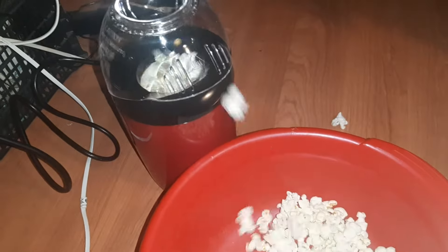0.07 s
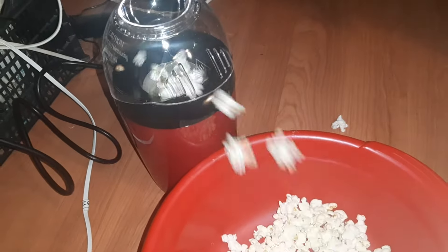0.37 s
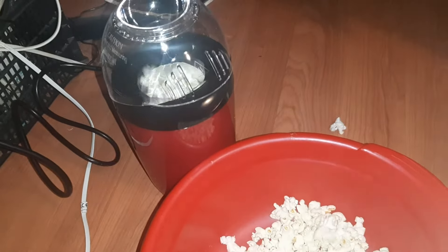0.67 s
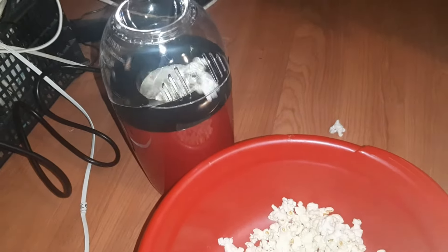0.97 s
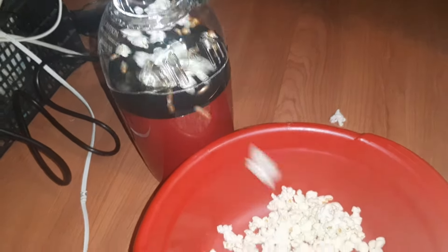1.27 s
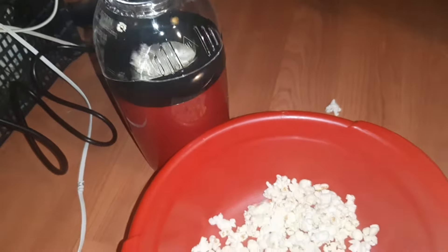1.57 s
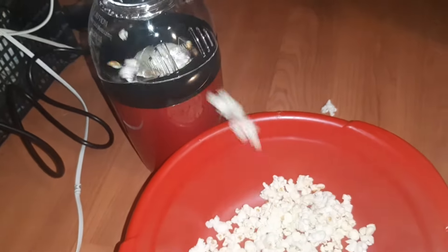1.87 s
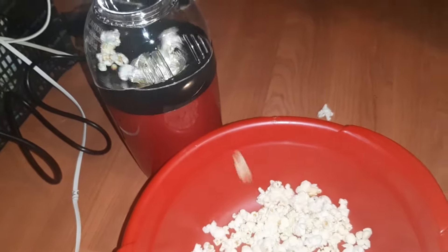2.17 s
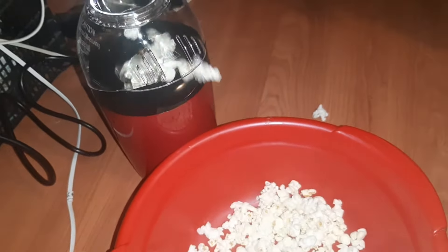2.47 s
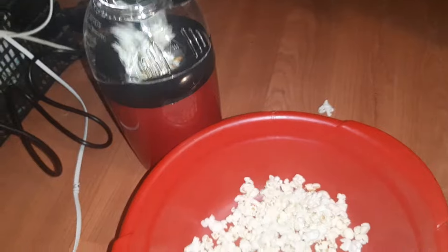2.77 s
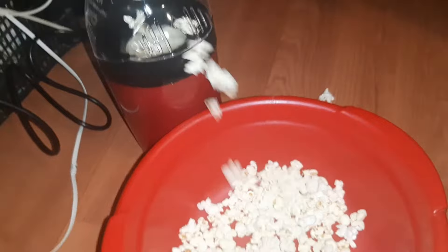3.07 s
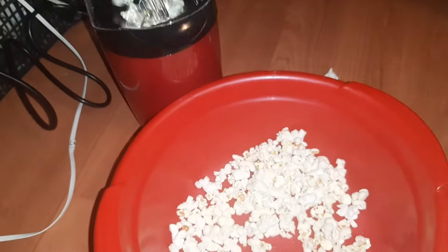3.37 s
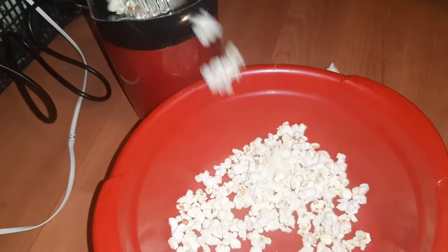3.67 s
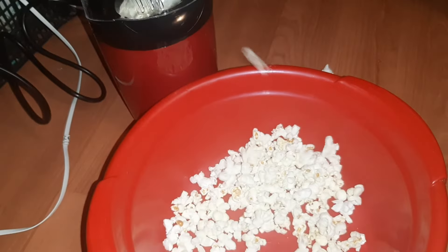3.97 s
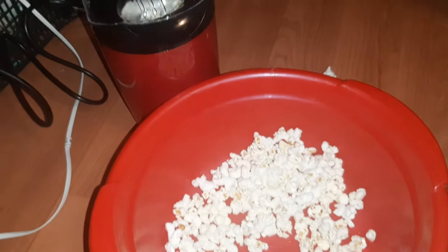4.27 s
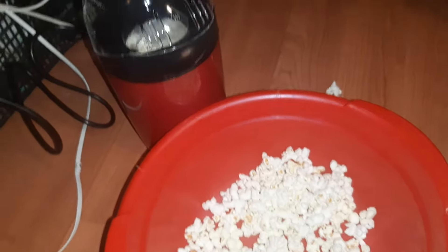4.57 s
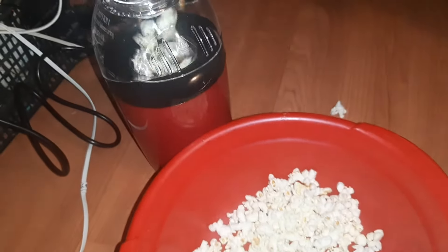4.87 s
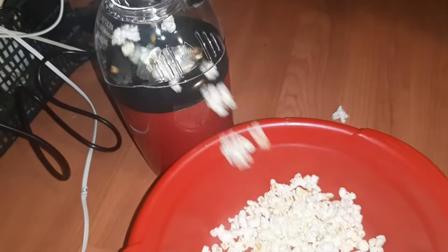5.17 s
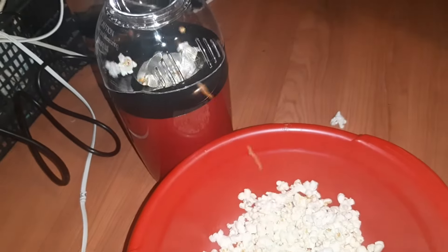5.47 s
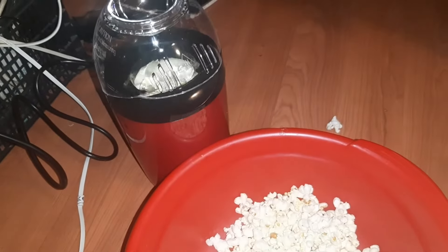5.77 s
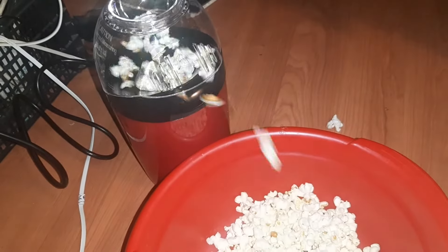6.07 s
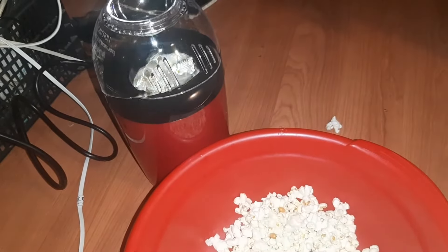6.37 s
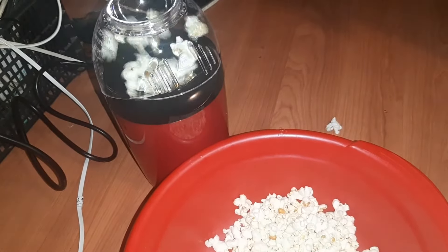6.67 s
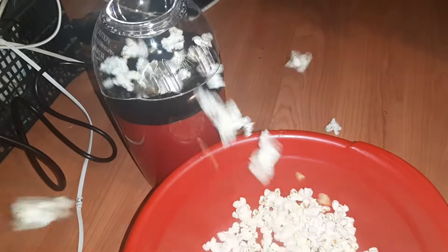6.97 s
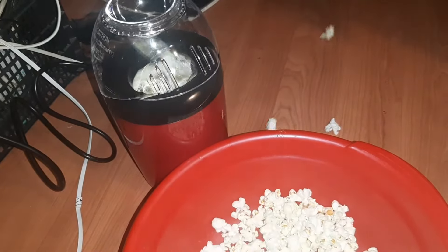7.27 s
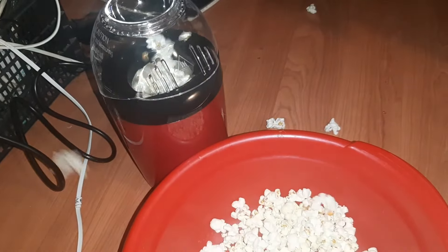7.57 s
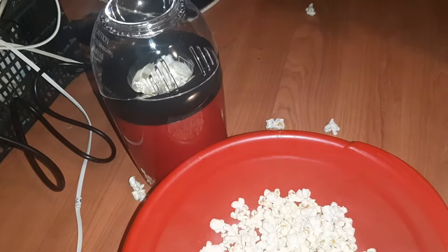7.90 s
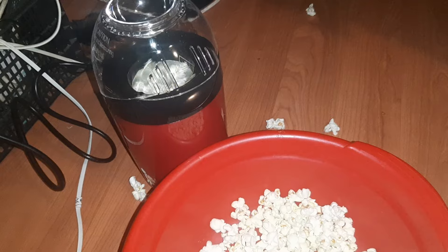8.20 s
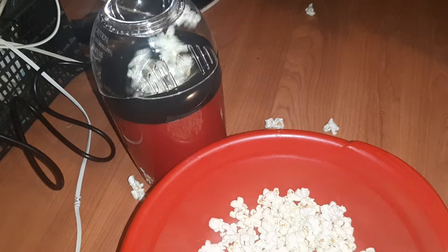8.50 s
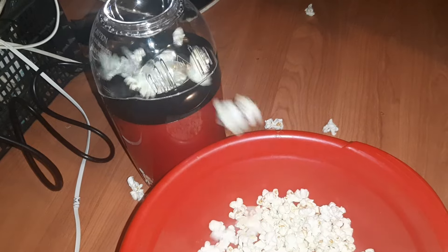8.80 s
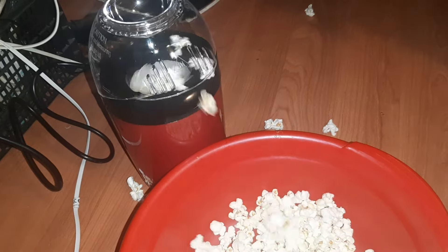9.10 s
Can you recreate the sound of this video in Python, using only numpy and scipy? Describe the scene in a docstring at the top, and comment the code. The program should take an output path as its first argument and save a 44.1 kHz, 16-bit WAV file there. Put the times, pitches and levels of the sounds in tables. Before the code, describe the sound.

A hot air popcorn maker hums and blows close up while kernels crack open and popped pieces rub and tap against plastic.

```python
"""Popcorn kernels burst with a crack and a puff of steam in a hot-air popper, close up in a small room.
The fresh popcorn scrapes and squeaks round the cup and the hood, pieces knock on the plastic,
and two hard pops jolt the housing. Underneath, the fan hums and blows through the popping cup.
A slow gain control sinks the whole sound for about a second after the loudest treble peaks."""
import sys
import numpy as np
from scipy import signal
from scipy.fft import rfft, irfft
from scipy.io import wavfile
from scipy.ndimage import uniform_filter1d, minimum_filter1d

SR = 44100
rng = np.random.default_rng(int(sys.argv[2]) if len(sys.argv) > 2 else 0)


def to_wav(sig):
    """Store sig (one row per channel, or 1-D mono) as 16-bit WAV at the path in sys.argv[1].

    Samples outside -1..1 are clipped; the rate is SR.
    """
    pcm = np.clip(np.atleast_2d(sig), -1, 1) * 32767
    pcm = np.round(pcm).astype(np.int16)
    wavfile.write(sys.argv[1], SR, pcm.T)  # frames by channels


N = 407484
HZ = np.fft.rfftfreq(N, 1 / SR)
FAN_DB = -21.5  # base level of the air, hum and swirl


def gain_of(db):
    """Decibels to gain."""
    return 10 ** (np.asarray(db) / 20)


def unit_rms(x):
    """Scales to rms 1."""
    return x / np.sqrt(np.mean(x ** 2) + 1e-20)


def at_hz(points, hz):
    """Reads a curve on a log-frequency axis."""
    freqs, values = np.transpose(points)
    return np.interp(np.log(hz + 1), np.log(freqs + 1), values)


def automation(points):
    """Reads a curve over time at every sample."""
    times, values = np.transpose(points)
    return np.interp(np.arange(N) / SR, times, values)


def add(mix, s, sound):
    """Mixes a sound in at s seconds."""
    part = mix[..., round(s * SR):][..., :sound.shape[-1]]
    part += sound[..., :part.shape[-1]]


def wander(rate_hz):
    """Smooth random modulation of rms 1."""
    return unit_rms(irfft(rfft(rng.standard_normal(N)) / (1 + (HZ / rate_hz) ** 4), N))


def grit(depth_db, size, hold):
    """A gain that jumps about within +/- depth_db, roughly every hold samples."""
    jumps = unit_rms(uniform_filter1d(rng.standard_normal(size), hold))
    return gain_of(depth_db * np.tanh(jumps))


def stroke(t, length_s, rise_s, ring_s):
    """An envelope that builds up, holds, then rings out."""
    return (1 - np.exp(-t / rise_s)) * np.exp(-np.maximum(t - length_s, 0) / ring_s)


def colour(x, gain):
    """Minimum-phase EQ with the given gain at each bin of x."""
    log_gain = np.log(np.maximum(np.r_[gain, gain[-2:0:-1]], 1e-5))
    phase = -signal.hilbert(log_gain).imag[:len(gain)]
    return irfft(rfft(x) * gain * np.exp(1j * phase))


def resonance(hz, centre_hz, width_hz):
    """Gain of a resonant band, 1 at its centre."""
    return 1 / np.sqrt(1 + ((hz ** 2 - centre_hz ** 2) / (width_hz * (hz + 1))) ** 2)


def from_left(x, lag_s):
    """The sound reaches the right microphone a little later."""
    return irfft(rfft(x) * np.exp(-2j * np.pi * HZ * lag_s * np.arange(2)[:, None]), N)


# Stereo image, tight in the bass and wide on top: (frequency [Hz], coherence [0-1])
COHERENCE = [(100, 0.99), (500, 0.9), (1000, 0.34), (2000, 0.59), (5000, 0.09), (15000, 0)]
def paired(x):
    """Makes two unrelated noises as alike as the two microphones hear them."""
    left, other = rfft(x)
    same = np.clip(at_hz(COHERENCE, HZ), 0, 1)
    return irfft(np.array([left, same * left + np.sqrt(1 - same ** 2) * other]), N)


# The small room's tail: (frequency [Hz], time to fall 60 dB [s])
ROOM_DECAY = [(150, 0.24), (1000, 0.91), (4000, 0.61), (8000, 0.028), (15000, 0.038)]
def room(x, gap_s=.005, size=22050):
    """Sparse reflections, each band dying at its own speed."""
    taps = rng.choice([-1., 1.], (2, size)) * (rng.random((2, size)) < .1)
    taps *= np.arange(size) > gap_s * SR
    hz, t, bands = signal.stft(taps, SR, nperseg=256)
    decay = gain_of(-60 * t / at_hz(ROOM_DECAY, hz)[:, None])
    tail = signal.istft(bands * decay, SR, nperseg=256)[1]
    return signal.fftconvolve(x, tail / np.linalg.norm(tail[0]), axes=1)[:, :N]


# Peaks and notches of the hood: (centre [Hz], width [Hz], gain before depth scaling [dB])
HOOD_EQ = [(1527, 110, -9), (1596, 157, 6), (2200, 46, -16), (2445, 89, 6), (3100, 890, -2.5),
           (3890, 230, 1.5), (4540, 43, 6.5), (5430, 2300, -4), (5770, 67, 6.5), (7340, 83, 1),
           (7740, 1070, -7), (8040, 140, 8.5), (11300, 240, 1.5)]
def hooded(x, depth=1.177):
    """The space under the hood colours what sounds inside it."""
    eq_db = sum(db * resonance(HZ, centre, width) ** 2 for centre, width, db in HOOD_EQ)
    return irfft(rfft(x) * gain_of(depth * eq_db), N)


# The bed of rushing air: (frequency [Hz], relative level [dB])
AIR_SPECTRUM = [(30, -42.5), (90, -23.5), (170, -14), (280, -7.5), (390, -12), (560, -4.5), (1200, -5.5),
                (1900, -11.5), (3300, -11), (4500, -7.5), (7000, -17.5), (9300, -31), (12000, -29),
                (15700, -38.5), (17000, -68)]
# Resonances of the air duct: (centre [Hz], width [Hz], lift above the rush [dB])
DUCT_MODES = [(525.7, 41, 12.5), (649.4, 42, 11), (751, 38, 10.5), (795, 5.9, 16.5), (866.6, 14, 13),
              (925, 66, 4), (1071, 28, 4.5), (1145, 44, 4.5), (1239, 32, 8)]
def air(level_db=-5.0, flicker_db=1.23):
    """Turbulence coloured by the duct, its level flickering slightly."""
    peaks = sum((gain_of(db) * resonance(HZ, hz, width) ** 2) ** 2 for hz, width, db in DUCT_MODES)
    spectrum = gain_of(at_hz(AIR_SPECTRUM, HZ)) * np.sqrt(1 + peaks)
    rush = irfft(rfft(rng.standard_normal((2, N))) * spectrum, N)
    return gain_of(FAN_DB + level_db + flicker_db * wander(23.0)) * unit_rms(rush)


# The fan's pitch, sagging a little: (time [s], pitch [Hz])
FAN_PITCH = [(0, 226.7), (1.1, 226.3), (1.9, 224.2), (7.9, 224.0), (9.24, 223.3)]
# Timbre of the hum: (harmonic [number], relative level [dB])
HUM_HARMONICS = [(1, 4.5), (2, -24), (3, -11), (5, -21.5), (6, -22), (7, -22), (10, -23)]
def hum(flutter=0.063, jitter_hz=0.548):
    """The fan's nearly pure tone with weak overtones."""
    cycles = np.cumsum(automation(FAN_PITCH) + jitter_hz * wander(26.2)) / SR
    tone = sum(gain_of(db) * np.cos(2 * np.pi * (k * cycles + rng.random())) for k, db in HUM_HARMONICS)
    return gain_of(FAN_DB) * unit_rms(tone) * (1 + flutter * wander(21))


# The whistle fades out as the fan slows: (time [s], level [dB])
WHISTLE_FADE = [(0, -57), (1.05, -55), (1.2, -86)]
def whistle(harmonic=50, waver_hz=9):
    """A faint, thin tone locked to the motor's speed."""
    hz = harmonic * automation(FAN_PITCH) + waver_hz * wander(15)
    return gain_of(automation(WHISTLE_FADE)) * np.sqrt(2) * np.sin(2 * np.pi * np.cumsum(hz) / SR)


def swirl(per_s=70, level_db=-15, fade_db_per_s=1.1, spread_db=4, ring_s=0.009):
    """Unpopped kernels tick as the air drives them round the cup, fading as they are used up."""
    hits = (rng.random(N) < per_s / SR) * gain_of(spread_db * np.minimum(rng.exponential(1, N), 3))
    ticks = signal.lfilter([1], [1, -np.exp(-1 / (ring_s * SR))], hits) * rng.standard_normal((2, N))
    band = resonance(HZ, centre_hz=2900, width_hz=2800) ** 2
    level = gain_of(FAN_DB + level_db - fade_db_per_s * np.arange(N) / SR)
    return level * unit_rms(irfft(rfft(ticks) * band, N))


# Low-end weight under two hard pops: (time [s], level [dB])
JOLTS = [(4.858, -18.5), (6.892, -8.5)]
def bumps(thud_hz=85, fall_s=0.0028, rebound_s=.01, rebound_db=-10, left_db=3, size=4096):
    """The light housing gives way with a low, damped thud, and drops back."""
    out, t = np.zeros(N), np.arange(size) / SR
    for s, db in JOLTS:
        thud = gain_of(db) * np.sin(2 * np.pi * thud_hz * t) * np.exp(-t / fall_s)
        add(out, s, thud)
        add(out, s + rebound_s, gain_of(rebound_db) * thud)
    return out * gain_of([[left_db], [-left_db]])


def landings(flight_s=(0.023, .25), softer_db=-20, centre_hz=(1900, 2850)):
    """Each pop flings a piece that lands softly after a random flight; gives cues for knocks()."""
    return [(s + rng.uniform(*flight_s), db + softer_db, rng.uniform(*centre_hz))
            for s, db, _, _ in KERNEL_POPS]


# Hard hits on the plastic: (time [s], relative level [dB], centre [Hz])
HARD_KNOCKS = [(.704, -25, 2280), (1.39, -30.5, 1990), (1.4551, -15.5, 3024), (2.505, -30, 2110),
               (2.5626, -28, 3650), (3.1034, -32.5, 2230), (3.1647, -37, 2900), (3.446, -23.5, 2420),
               (4.864, -29, 1090), (6.0075, -26, 1100), (6.8925, -19, 2700)]
def knocks(level_db=-9, width=0.32, size=4096):
    """Pieces make short contacts, hard and soft, with well-damped plastic."""
    out, t, hz = np.zeros((2, N)), np.arange(size) / SR, np.fft.rfftfreq(size, 1 / SR)
    contact = stroke(t, length_s=.002, rise_s=.0005, ring_s=.0016)
    for s, db, centre_hz in list(HARD_KNOCKS) + landings():
        blow = rng.standard_normal((2, size)) * contact
        band = resonance(hz, centre_hz, width * centre_hz) ** 2
        add(out, s, gain_of(db + level_db) * unit_rms(colour(blow, band)))
    return out


LOW, MIDDLE, HIGH, TOP = 2840, 3222, 4620, 5090  # modes of the cup [Hz]
# Squeak cues: (time [s], length [s], lower mode [Hz], its relative level [dB], upper modes' level [dB])
SQUEAK_CUES = [(.715, .009, MIDDLE, -19, -30), (0.762, .016, LOW, -24, -17.5),
               (1.228, 0.023, LOW, -29, -27.5), (3.482, 0.022, LOW, -17.5, -32),
               (4.888, 0.019, LOW, -19, -12.5), (5.027, 0.011, LOW, -28, -43),
               (6.006, 0.085, LOW, -47.5, -24)]
def squeaks(level_db=1, upper_share=0.34, top_db=-14, waver_hz=35, rough=0.1, fuzz_db=-12, size=8192):
    """Stick and slip locks onto the cup's modes for a moment; a fuzzy ring lingers in the hood."""
    out, t, bins = np.zeros((2, N)), np.arange(size) / SR, np.fft.rfftfreq(size, 1 / SR)
    for s, whole_s, lower_hz, lower_db, upper_db in SQUEAK_CUES:
        upper_s = upper_share * whole_s  # the upper modes slip sooner
        modes = (lower_hz, whole_s, lower_db), (HIGH, upper_s, upper_db), (TOP, upper_s, upper_db + top_db)
        for hz, length_s, db in modes:
            bend, grip = unit_rms(uniform_filter1d(rng.standard_normal((2, size)), size=90))
            tone = unit_rms(np.sin(2 * np.pi * np.cumsum(hz + waver_hz * bend) / SR)) * (1 + rough * grip)
            tone *= stroke(t, length_s, rise_s=0.0013, ring_s=0.013)
            band = resonance(bins, hz, width_hz=260) ** 2
            fuzz = unit_rms(colour(rng.standard_normal((2, size)), band))
            fuzz *= stroke(t, length_s, rise_s=0.0023, ring_s=0.04)
            add(out, s, gain_of(db + level_db) * (tone + gain_of(fuzz_db) * fuzz))
    return out


# Popcorn rubbing along the cup and hood: (time [s], length with echo [s], drag [dB], bite [dB])
SCRAPE_CUES = [(0.291, 0.019, -26, -42), (0.711, 0.039, -12.5, -11), (0.766, .02, -18.5, -13),
               (0.976, 0.012, -29, -33), (1.234, 0.089, -25, -28), (2.556, 0.0094, -15.5, -39),
               (2.804, 0.038, -23.5, -48), (3.477, 0.14, -26.5, -20), (3.78, 0.026, -24.5, -23),
               (4.891, 0.04, -24, -11.5), (5.023, 0.027, -20.5, -31), (5.189, 0.022, -21.5, -31.5),
               (6.009, 0.09, -26.5, -16), (6.688, .02, -30.5, -44), (6.822, 0.033, -15.5, -9.5),
               (6.995, 0.017, -24, -35.5), (7.348, 0.024, -20, -29)]
def scrapes(level_db=-1, bite_hz=5530, drag_hz=3450, bite_share=0.12, drag_wait_s=0.0038,
            width=0.63, echo_db=-14, top_hz=7300, size=8192):
    """Dry popcorn slips unevenly: a bright bite, a lower drag, and a brief echo under the hood."""
    out, t, hz = np.zeros((2, N)), np.arange(size) / SR, np.fft.rfftfreq(size, 1 / SR)
    for s, whole_s, drag_db, bite_db in SCRAPE_CUES:
        bite = (s, bite_share * whole_s, bite_hz, bite_db)
        drag = (s + drag_wait_s, whole_s, drag_hz, drag_db)
        for start, length_s, centre_hz, db in bite, drag:
            slips = grit(depth_db=3.5, size=size, hold=50)
            band = resonance(hz, centre_hz, width * centre_hz) ** 2 / np.sqrt(1 + (hz / top_hz) ** 6)
            rub = unit_rms(colour(slips * rng.standard_normal((2, size)), band))
            contact = stroke(t, length_s / 2, rise_s=.0006, ring_s=0.0082)
            echo = gain_of(echo_db) * stroke(t, length_s, rise_s=0.025, ring_s=.035)
            add(out, start, gain_of(db + level_db) * rub * (contact + echo))
    return out


# The hollow body of escaping steam: (frequency [Hz], relative level [dB])
STEAM_SPECTRUM = [(25, -47), (70, -30), (170, 20.5), (400, -8), (530, -20), (750, -3), (1250, -7),
                  (2200, 0.5), (6000, -64)]
def puffs(steam_db=-17, thump_db=4, thump_hz=125, hollow_db=17, usual_db=-44, follows=0.4, size=4096):
    """Each kernel's steam thumps and sounds the hollow cup; its draught favours the left microphone."""
    thumps, hollow, t = np.zeros(N), np.zeros((2, N)), np.arange(size) / SR
    spectrum = gain_of(at_hz(STEAM_SPECTRUM, np.fft.rfftfreq(size, 1 / SR)))
    thump = stroke(t, length_s=.003, rise_s=.001, ring_s=.005) * np.cos(2 * np.pi * thump_hz * t)
    release = stroke(t, length_s=0.001, rise_s=0.00027, ring_s=0.016)
    for crack_s, crack_db, _, wait_s in KERNEL_POPS:
        s, db = crack_s + wait_s, crack_db + steam_db
        add(thumps, s, gain_of(db + thump_db) * thump)
        steam = unit_rms(colour(rng.standard_normal((2, size)), spectrum)) * release
        evened_db = usual_db + follows * (db - usual_db)  # the body varies less than the crack
        add(hollow, s, gain_of(evened_db + hollow_db) * steam)
    low_cut = signal.butter(2, 230, "highpass", fs=SR, output="sos")
    return paired(signal.sosfilt(low_cut, hollow)) + thumps * gain_of([[3.5], [-3.5]])


# The snap of a hull: (frequency [Hz], relative level [dB])
CRACK_SPECTRUM = [(100, -9), (300, 2.5), (1000, 12), (2000, -3.5), (3000, -0.5), (4200, 11.5), (6800, 10),
                  (9300, -2.5), (12000, -1.5), (15500, -6), (17000, -51)]
# Bursting kernels: (time [s], relative level [dB], brightness before tilt [dB], wait for the tear [s])
KERNEL_POPS = [(0.1139, -19.5, -10, 0.0015), (0.184, -17.5, -6, .002), (0.6929, -19.5, -12, .004),
               (1.071, -22, -11, 0.0022), (1.176, -20.5, -15, 0.0021), (1.677, -26.5, -11, .002),
               (1.7638, -23.5, -19, 0.0024), (1.946, -18, -8, 0.0022), (2.275, -22.5, -16.5, 0.014),
               (2.4894, -24, -16.5, 0.0024), (2.7616, -19.5, -9, 0.011), (3.3286, -21.5, -10.5, 0.0031),
               (3.4295, -18, -7, 0.0077), (3.698, -24.5, 4, 0.0015), (4.855, -16.5, -16, 0.013),
               (4.9847, -21.5, 2, 0.0024), (5.05, -26, -15, 0.0017), (5.1544, -25, -4.5, 0.0014),
               (5.2487, -25, -11, .002), (5.283, -22, -5, 0.0017), (5.456, -25, 0, .002),
               (5.476, -19, -11, 0.0023), (5.8391, -17, -26, .002), (5.9656, -17.5, 6, 0.0014),
               (6.631, -18, -7, 0.0022), (6.796, -21, -6.5, 0.0028), (6.8913, -10, -8.5, 0.012),
               (7.3822, -20, -12, 0.0019), (7.4324, -20.5, -3, 0.0018), (8.4659, -24, -1, 0.0022),
               (8.689, -19.5, -12, 0.0023), (8.8217, -15.5, -3.5, 0.0075)]
def cracks(level_db=-9, tear_db=-3, rise_s=0.00049, fall_s=0.0029, hood_db=-15, hood_s=0.024,
           tilt=0.84, plain_db=-7, size=4096):
    """A hull cracks, then tears open: each a few milliseconds of tiny snaps that echo under the hood."""
    out, t, hz = np.zeros((2, N)), np.arange(size) / SR, np.fft.rfftfreq(size, 1 / SR)
    attack = 1 - np.exp(-(t / rise_s) ** 2)
    envelope = attack * (np.exp(-t / fall_s) + gain_of(hood_db) * np.exp(-t / hood_s))
    high_shelf = 1 / (1 + (7500 / (hz + 1)) ** 5)
    for s, db, bright_db, wait_s in KERNEL_POPS:
        spectrum = gain_of(at_hz(CRACK_SPECTRUM, hz) + tilt * (bright_db - plain_db) * high_shelf)
        for start, stage_db in (s, db), (s + wait_s, db + tear_db):
            snaps = grit(depth_db=3, size=size, hold=12)
            burst = colour(envelope * snaps * rng.standard_normal((2, size)), spectrum)
            add(out, start, gain_of(stage_db + level_db) * unit_rms(burst))
    return out


def scene(pop_send_db=-9, scrape_send_db=-12, squeak_send_db=-20):
    """Pops, rubbing and knocks over the running machine, with reverb sends to the room."""
    pops = from_left(hooded(paired(cracks())) + puffs(), lag_s=.00005)
    rubs, squeals = hooded(paired(scrapes())), squeaks()
    machine = from_left(hum() + whistle() + hooded(paired(air() + swirl())), lag_s=.00012)
    send = gain_of(pop_send_db) * pops + gain_of(scrape_send_db) * rubs + gain_of(squeak_send_db) * squeals
    return machine + pops + rubs + squeals + room(send) + paired(knocks()) + bumps()


def gain_control(x, threshold_db=-15.0, slope=1.77, hold_s=1.1, glide_s=0.3, start_db=-2, treble_hz=4000):
    """Loud treble peaks duck the whole mix: the gain glides down, holds, and glides back."""
    treble = irfft(rfft(x) / np.sqrt(1 + (treble_hz / (HZ + 1)) ** 6), N)
    level_db = 10 * np.log10(abs(uniform_filter1d((treble ** 2).mean(0), size=66)) + 1e-12)
    wanted = gain_of(-slope * np.maximum(level_db - threshold_db, 0))
    hold, keep = round(hold_s * SR), np.exp(-1 / (glide_s * SR))
    held = minimum_filter1d(wanted, hold, origin=(hold - 1) // 2, mode="nearest")
    return x * signal.lfilter([1 - keep], [1, -keep], held, zi=[gain_of(start_db)])[0]


# The left microphone is nearer and hears more treble: (frequency [Hz], left minus right [dB])
MIC_BALANCE = [(224, 3), (600, 3), (1200, 3), (2500, 2), (4200, -2.5), (5500, 2.5), (7500, 17.5),
               (10000, 7), (15000, 6.5)]
def record(dry, ceiling=.88, top_hz=16500):
    """The microphones' balance, gain control, a soft clip on the highest peaks, then a low-pass."""
    lean = gain_of(at_hz(MIC_BALANCE, HZ) / 2)
    heard = gain_control(irfft(rfft(dry) * np.array([lean, 1 / lean]), N))
    rounded = heard / (1 + (heard / ceiling) ** 8) ** (1 / 8)
    low_pass = signal.firwin(511, top_hz, window=("kaiser", 9), fs=SR)
    return signal.oaconvolve(rounded, low_pass[None], "same")


dry = scene()
out = record(dry)
to_wav(out)
```